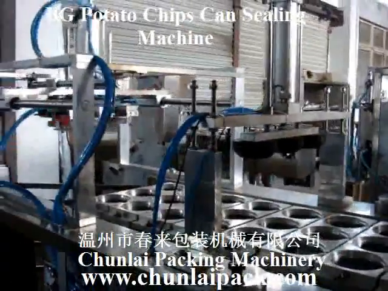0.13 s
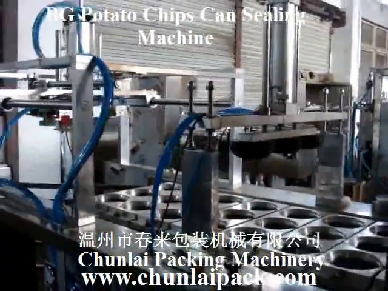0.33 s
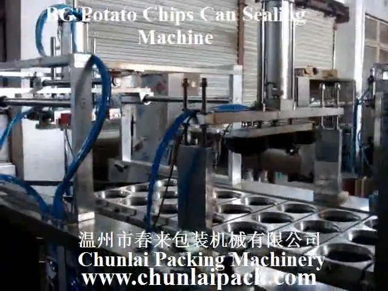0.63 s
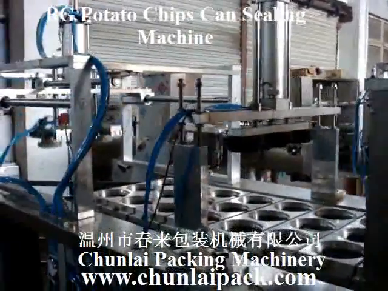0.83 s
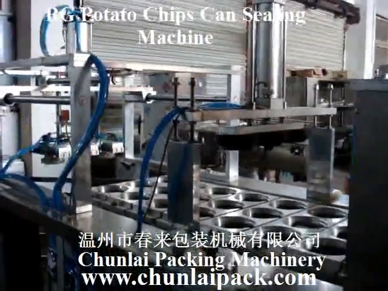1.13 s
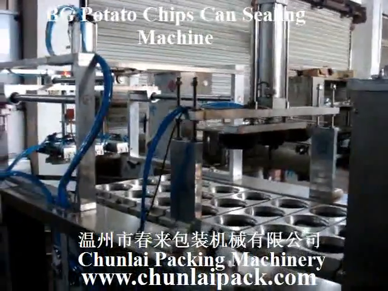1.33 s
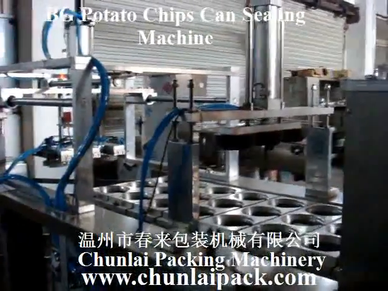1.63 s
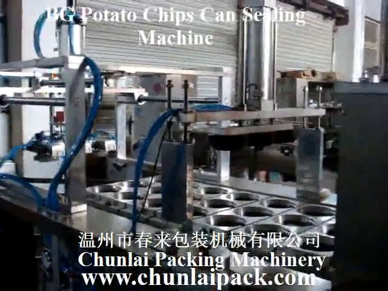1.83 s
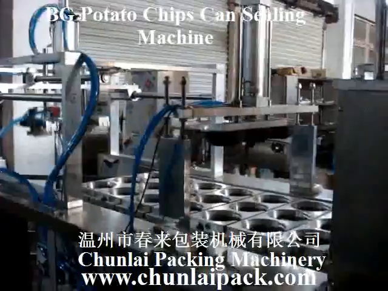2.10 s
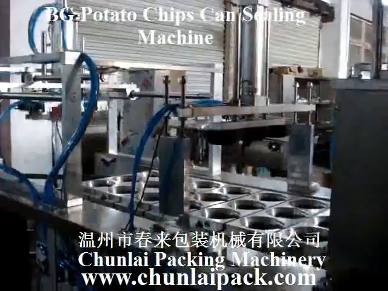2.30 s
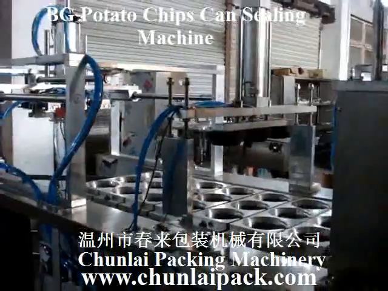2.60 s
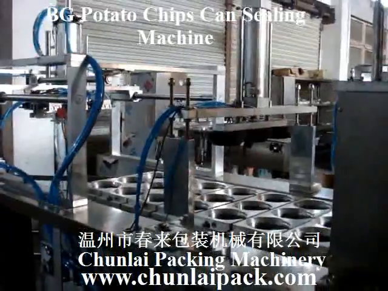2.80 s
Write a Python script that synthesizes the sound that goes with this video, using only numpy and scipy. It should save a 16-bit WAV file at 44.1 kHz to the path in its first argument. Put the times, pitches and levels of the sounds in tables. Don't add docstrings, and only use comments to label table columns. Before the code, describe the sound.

Loud bursts of escaping compressed air from a can-sealing machine, with clanking pistons and drive roar

```python
import sys
import numpy as np
from scipy import signal
from scipy.io import wavfile

SR = 44100
rng = np.random.default_rng(int(sys.argv[2]) if len(sys.argv) > 2 else 0)


def transcribe(signal):
    frames = np.atleast_2d(signal).T
    limited = np.clip(frames, -1, 1)
    pcm = np.round(limited * 32767).astype(np.int16)
    wavfile.write(sys.argv[1], SR, pcm)


def ratio_of_db(decibels):
    return 10 ** (np.asarray(decibels, float) / 20)


N = 130095

FIRST_OPEN_S, FIRST_CLOSE_DB_PER_S = 0.571, 500
# start [s], open time [s], level [dB], sag [dB/s], closing rate [dB/s].
JETS = [
    (0.636, FIRST_OPEN_S, -20, 0.5, FIRST_CLOSE_DB_PER_S),
    (1.852, 0.55, -19.5, -2, 141),
]


def rms_one(x):
    return x / np.sqrt(np.mean(x ** 2) + 1e-20)


def drift(rate_hz):
    r = np.exp(-80 * np.pi * rate_hz / SR)
    white = rng.standard_normal(N // 40 + 2002)
    slow = rms_one(signal.lfilter([1], [1, -2 * r, r * r], white)[2000:])
    return np.interp(np.arange(N) / 40, np.arange(len(slow)), slow)


def resonance(x, hz, width_hz):
    r = np.exp(-np.pi * width_hz / SR)
    poles = [1, -2 * r * np.cos(2 * np.pi * hz / SR), r * r]
    return signal.lfilter([(1 - r * r) / 2, 0, (r * r - 1) / 2], poles, x)


def rung(x, peaks, flicker_db=0):
    out = 0
    for k, (hz, width_hz, db) in enumerate(peaks):
        gain = ratio_of_db(db + flicker_db * drift(10.0))
        out = out + gain * resonance(x, hz, max(width_hz, 10)) * (-1) ** k
    return rms_one(out)


def banded(spectrum, patchy_db, white=None):
    white = rng.standard_normal((2, N)) if white is None else white
    hz, db = np.transpose(spectrum)
    top_hz = 9500
    edges_hz = hz[0] * 2 ** np.arange(0, np.log2(top_hz / hz[0]), 1 / 5)
    together = drift(8.0)
    out = 0
    for k, (low, high) in enumerate(zip(edges_hz, edges_hz[1:])):
        sos = signal.butter(2, [low, high], "band", fs=SR, output="sos")
        band = signal.sosfilt(sos, white[k % 2])
        level_db = np.interp(np.log(low * high) / 2, np.log(hz[:-2]), db[:-2])
        out = out + band * ratio_of_db(level_db + patchy_db * (0.24 * together + drift(10.0)))
    return rms_one(out)


def valve(start_s, open_s, level_db, sag_db_per_s, close_db_per_s, opening_s=0.0024):
    t = np.arange(N) / SR - start_s
    sag_db = sag_db_per_s * np.clip(t, 0, open_s)
    close_db = close_db_per_s * np.clip(t - open_s, 0, 1)
    return np.clip(t / opening_s, 0, 1) * ratio_of_db(level_db - sag_db - close_db)


def pipe_tone(pipe):
    widen, flicker_db = 1.3, 2.5
    white = rng.standard_normal((2, N))
    out = 0
    for k, (hz, width_hz, db) in enumerate(pipe):
        once = resonance(white[k % 2], hz, widen * width_hz)
        out = out + ratio_of_db(db + flicker_db * drift(6.5)) * resonance(once, hz, widen * width_hz)
    return rms_one(out)


def jets():
    # frequency [Hz], density [dB per Hz].
    jet_a = [(410, -49), (690, -14), (1300, -15), (1810, -10.5), (3700, -8.5), (4670, -5.5), (5760, -4.5),
             (8500, -2.5), (11000, -35), (18700, -120)]
    jet_b = [(410, -48), (690, -31), (825, -19), (1450, -25), (1890, -16.5), (3600, -12.5), (4000, -9),
             (6200, -8.5), (8500, -12), (11000, -35), (18700, -120)]
    # frequency [Hz], width [Hz], level [dB].
    pipe_a = [(2545, 170, -12), (4060, 150, -3.5), (5176, 100, -2.5), (5730, 240, 0), (6350, 440, -2),
              (6600, 150, -6), (7670, 280, -2)]
    pipe_b = [(1920, 64, -8.5), (2266, 44, -9), (3140, 58, -16), (3890, 53, 0.5), (4030, 130, -1.5),
              (4480, 70, -1.5), (5070, 99, -4), (6010, 150, -1), (6400, 230, -0.5), (6760, 200, 3.5),
              (7760, 220, -10), (8190, 330, -2)]
    # level re jet [dB], fade [dB/s].
    sigh_rows = [
        (-8, 34),
        (-17.5, 52),
    ]
    pipe_db, low_hz = -2.5, 455
    body_hz, body_lingers_s, body_close_db_per_s = 3840, 0.036, 70.5
    low_cut = signal.butter(4, low_hz, "high", fs=SR, output="sos")
    body_filter = signal.butter(3, body_hz, fs=SR, output="sos")
    out = 0
    for jet, colour, pipe, sigh_row in zip(JETS, (jet_a, jet_b), (pipe_a, pipe_b), sigh_rows):
        start_s, open_s, db, sag, close = jet
        sigh_db, fade_db_per_s = sigh_row
        air = banded(colour, patchy_db=0.8) + ratio_of_db(pipe_db) * pipe_tone(pipe)
        air = signal.sosfilt(low_cut, air)
        body = signal.sosfiltfilt(body_filter, air)
        main = valve(start_s, open_s, db, sag, close)
        sigh = valve(start_s, open_s, db + sigh_db, sag, fade_db_per_s)
        body_flow = valve(start_s, open_s + body_lingers_s, db, sag, body_close_db_per_s)
        out = out + np.maximum(main, sigh) * (air - body) + body_flow * body
    return out


def whistles():
    # frequency [Hz], width [Hz], level re jet [dB].
    whistle_rows = [(1570, 70, -15), (3140, 150, -17)]
    sag_db_per_s, flicker_db = 10, 0.8
    tones = 0
    for hz, width_hz, db in whistle_rows:
        once = resonance(rng.standard_normal(N), hz, width_hz)
        tones = tones + ratio_of_db(db + flicker_db * drift(13.0)) * rms_one(resonance(once, hz, width_hz))
    start_s, open_s, level_db, _, close = JETS[0]
    return valve(start_s, open_s, level_db, sag_db_per_s, close) * tones


def puffs():
    # start [s], open time [s], level [dB], after-breath level [dB], swell [s].
    puff_rows = [
        (0.26, 0.016, -26, -21.5, .0054),
        (0.638, 0.033, -21.5, -36, .0054),
        (1.339, 0.016, -18.5, -27, 0.015),
        (1.489, 0.012, -36, -31.5, 0.005),
        (1.576, 0.06, -33, -37, 0.0043),
        (1.755, 0.053, -31.5, -27.5, 0.011),
        (1.847, 0.009, -23, -28, .0054),
        (2.553, 0.0076, -16.5, -34.5, 0.0033),
        (2.782, 0.033, -29, -32, 0.009),
    ]
    # frequency [Hz], density [dB per Hz].
    puff_spectrum = [(900, -18), (2000, -5.5), (3400, -9.5), (4600, -4), (5900, 2), (7200, -3), (8500, 4),
                     (11000, -40), (19000, -120)]
    sag_db_per_s, close_db_per_s, breath_db_per_s = 33, 583.5, 70.5
    flow = 0
    for start_s, open_s, db, breath_db, swell_s in puff_rows:
        flow = flow + valve(start_s, open_s, db, sag_db_per_s, close_db_per_s, swell_s)
        flow = flow + valve(start_s, open_s, breath_db, sag_db_per_s, breath_db_per_s, swell_s)
    return flow * banded(puff_spectrum, patchy_db=1.95)


def leak():
    # start [s], open time [s], level [dB], sag [dB/s].
    leak_rows = [
        (-.1, .74, -26, 2),
        (1.488, 0.11, -27.5, 15),
        (1.577, 0.13, -35, -8),
        (1.706, 0.046, -26, 16),
        (1.75, 0.024, -28.5, 3),
        (1.827, .02, -23, 22),
        (2.784, .3, -23.5, 15.5),
    ]
    # frequency [Hz], density [dB per Hz].
    leak_spectrum = [(3000, -15), (4400, -2), (5500, -8.5), (6800, -19.5), (7500, 1.5), (8100, 0.1),
                     (8700, 3.5), (11000, -40), (19000, -120)]
    close_db_per_s = 299.5
    flow = sum(valve(*row, close_db_per_s) for row in leak_rows)
    return flow * banded(leak_spectrum, patchy_db=0.4)


def ticks():
    # time [s], peak [dB].
    tick_rows = [
        (.266, -13),
        (.644, -9),
        (1.850, -7),
        (2.555, -11),
        (2.787, -19),
    ]
    tick_s, tick_hz = 0.00066, 660
    start_s, peak_db = np.transpose(tick_rows)[..., None]
    t = np.arange(N) / SR - start_s
    swing = np.exp(-(t / tick_s) ** 2) * np.sin(2 * np.pi * tick_hz * t)
    return np.sum(ratio_of_db(peak_db) * swing, axis=0)


def knocks():
    # time [s], peak [dB], pitch [Hz], decay to -60 dB [cycles].
    knock_rows = [(.005, -14.5, 842, 86), (.035, -18.5, 778, 77), (.002, -12.5, 447, 25),
                  (.029, -13, 930, 47), (.062, -19.5, 780, 45), (.087, -13, 765, 43), (.105, -14, 778, 70),
                  (0.169, -17.5, 397, 26), (.202, -14.5, 737, 59), (0.269, -11, 820, 26),
                  (.41, -22, 784, 63), (.445, -18, 700, 45), (.51, -17.5, 382, 58), (.555, -15, 660, 40),
                  (.565, -20, 380, 23), (.6, -18, 720, 37), (.622, -17, 640, 30), (.62, -20, 380, 23),
                  (1.735, -17, 285, 25), (1.133, -30.5, 104, 7.3), (1.486, -18.5, 1060, 52),
                  (1.539, -33, 264, 58), (1.588, -15.5, 860, 52), (1.591, -14.5, 1722, 79),
                  (1.589, -18.5, 2350, 53), (1.68, -21, 2370, 82), (1.682, -16, 900, 30),
                  (1.691, -15.5, 942, 80), (1.693, -13, 502, 21), (1.703, -12.5, 790, 30),
                  (1.71, -15, 910, 25), (1.713, -15, 1473, 45), (1.714, -26.5, 2040, 45),
                  (1.727, -11.5, 850, 49), (1.745, -13.5, 527, 25), (1.751, -16, 898, 53),
                  (1.766, -14, 1120, 67), (1.769, -17, 1340, 93), (1.791, -18.5, 571, 49),
                  (1.828, -18, 476, 28), (1.733, -26.5, 99, 8.2), (1.792, -16.5, 129.7, 8.9),
                  (1.847, -12.5, 1564, 50), (1.849, -12, 364, 13), (2.6, -30.5, 274.6, 130),
                  (2.785, -17.5, 876, 66), (2.798, -12, 1310, 23)]
    mode_ratios = [.55, 1, 1.37, 1.95, 2.6]
    loss_db, spread_db, contact_cycles = 7.5, 0.72, 1.2
    t = np.arange(SR // 4) / SR
    out = np.zeros(N + SR)
    chance = rng.standard_normal((len(knock_rows), len(mode_ratios)))
    for (start_s, db, hz, cycles), luck in zip(knock_rows, chance):
        first = int(start_s * SR)
        contact = np.clip(t * hz / contact_cycles, 0, 1)
        for ratio, u in zip(mode_ratios, luck):
            mode_db = db - 0.5 - loss_db * abs(np.log2(ratio)) * 2 + spread_db * u
            gain = ratio_of_db(mode_db - 60 * t * hz / cycles)
            out[first:first + len(t)] += gain * contact * np.sin(2 * np.pi * hz * ratio * t)
    return out[:N]


def drive():
    # start [s], length [s], level [dB], sag [dB/s].
    stroke_rows = [
        (-.05, 0.044, -9.5, 13),
        (-.05, 0.66, -19.5, 8),
        (1.376, 0.056, -29.5, 25),
        (1.476, 0.26, -42, -12),
        (1.678, 0.16, -27, 6),
        (1.913, 0.052, -31, 26),
        (2.603, 0.218, -35, 26),
        (2.777, .04, -32, 60),
        (2.805, 0.18, -35, -5),
    ]
    # frequency [Hz], density [dB per Hz].
    roar_spectrum = [(24, -86), (40, -22), (210, -19.5), (377, -3), (564, -7), (755, 0.5), (1010, -6),
                     (2100, -8.5), (3030, -13.5), (8500, -19), (11000, -46), (18700, -120)]
    # frequency [Hz], width [Hz], level [dB].
    frame_modes = [(281.2, 8.8, -9), (396.5, 30, -4), (648.6, 33, -3.5), (740.5, 17.7, 1.5), (851, 49, -1),
                   (1135, 11, -11.5), (1380, 58, -7.5)]
    rattles_per_s, rattle_db, frame_db, stop_db_per_s = 900, -5, -2, 1501
    hits = rng.random(N) < rattles_per_s / SR
    force = ratio_of_db(5.4 * np.minimum(rng.exponential(1, N), 3))
    clicks = hits * force * rng.choice([-1, 1], N)
    shake = rng.standard_normal((2, N)) + ratio_of_db(rattle_db) * rms_one(clicks)
    roar = banded(roar_spectrum, patchy_db=1.1, white=shake) + ratio_of_db(frame_db) * rung(shake[0], frame_modes)
    return sum(valve(*row, stop_db_per_s) for row in stroke_rows) * roar


def duck_db():
    # time [s], gain [dB].
    duck_rows = [(0, 0), (.65, 12.5), (.67, -4.5), (1.101, -3), (1.25, 3), (1.85, 9.5), (1.88, -1.5),
                 (2.2, 2.5), (2.45, 0), (2.6, 3), (2.95, 5.5)]
    s, db = np.transpose(duck_rows)
    return np.interp(np.arange(N) / SR, s, db)


def far_machines():
    # frequency [Hz], density [dB per Hz].
    floor_spectrum = [(24, -108.5), (40, -31), (377, -12), (551, -9.5), (738, -7), (1030, -12),
                      (1290, -9.5), (1550, -13.5), (8500, -21.5), (11000, -60), (18700, -120)]
    # frequency [Hz], width [Hz], level [dB].
    hum_rows = [(276, 18, -1), (381.6, 16, -2.5), (748, 18, -5)]
    floor_db, hum_db, hum_flicker_db = -34, -14, 5.5
    bass_hz, bass_duck_share = 447, 0.73
    hum = rung(rng.standard_normal(N), hum_rows, hum_flicker_db)
    floor = banded(floor_spectrum, patchy_db=2.5) + ratio_of_db(hum_db) * hum
    bass = signal.sosfiltfilt(signal.butter(2, bass_hz, fs=SR, output="sos"), floor)
    ducked_bass = bass * ratio_of_db(bass_duck_share * np.minimum(duck_db(), 0))
    return ratio_of_db(floor_db + duck_db()) * (floor - bass + ducked_bass)


def shop(x):
    t60_s, level_db = 0.76, -7.5
    t = np.arange(SR) / SR
    tail = rng.standard_normal(SR) * ratio_of_db(-60 * t / t60_s) * (t > 0.01)
    tail = tail / np.sqrt(np.sum(tail ** 2))
    return ratio_of_db(level_db) * signal.fftconvolve(x, tail)[:N]


def scene():
    tail_duck_share = 1.7
    air = jets() + whistles() + puffs() + leak()
    blows = ticks() + knocks()
    blow_tail = shop(blows) * ratio_of_db(tail_duck_share * np.minimum(duck_db(), 0))
    mono = air + shop(air) + blows + blow_tail + drive() + far_machines()
    return np.array([mono, mono])


def holes(x):
    from_hz, band_hz, hole_db = 5500, 430, -22
    share = 0.022 * np.array([0, 0.6, 1.1, 1.1, 0.9, 0.4, 0.3, 4.0])
    hz, _, cells = signal.stft(x, SR, nperseg=512)
    frames = cells.shape[-1]
    band = np.clip((hz - from_hz) // band_hz + 1, 0, 7).astype(int)
    empty = rng.random((8, frames // 2 + 1)) < share[:, None]
    empty = np.repeat(empty, 2, axis=1)
    cells = cells * ratio_of_db(hole_db * empty[band, :frames])
    return signal.istft(cells, SR, nperseg=512)[1][..., :N]


def dropouts(x):
    # start [s], length [s], lower edge [Hz], upper edge [Hz].
    dropout_rows = [(.629, .008, 5000, 7600), (1.318, .007, 5500, 7300), (1.371, .011, 5600, 6400),
                    (1.456, .01, 5100, 5600), (1.471, .008, 8000, 9500), (1.566, .009, 5200, 7700),
                    (1.741, .01, 6200, 7700), (1.818, .01, 6000, 7500), (2.537, .014, 4700, 7400),
                    (2.537, .011, 7900, 9500), (2.753, .026, 5500, 9500), (2.76, .011, 5000, 5700)]
    left, fade_s = 0.012, 0.003
    t = np.arange(N) / SR
    for start_s, length_s, low_hz, high_hz in dropout_rows:
        inside_s = np.minimum(t - start_s, start_s + length_s - t)
        lost = np.clip(inside_s / fade_s + 0.5, 0, 1)
        sos = signal.butter(8, [low_hz, high_hz], "band", fs=SR, output="sos")
        x = x - (1 - left) * lost * signal.sosfiltfilt(sos, x)
    return x


def band_limit(x):
    return signal.sosfilt(signal.butter(12, 9690, fs=SR, output="sos"), x)


def record(dry):
    mic_low_hz, cutoff_hz = 90, 8485
    x = dropouts(holes(np.tanh(dry)))
    x = signal.sosfilt(signal.butter(2, mic_low_hz, "high", fs=SR, output="sos"), x)
    x = signal.sosfiltfilt(signal.ellip(8, 0.5, 54, cutoff_hz, fs=SR, output="sos"), x)
    return band_limit(x)


dry = scene()
out = record(dry)
transcribe(out)
```